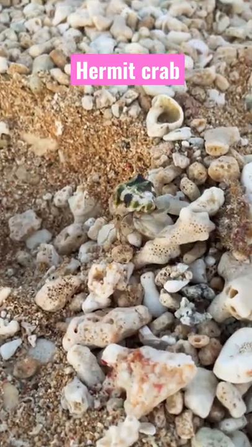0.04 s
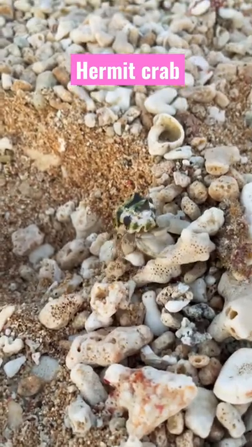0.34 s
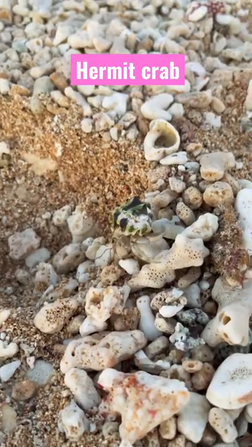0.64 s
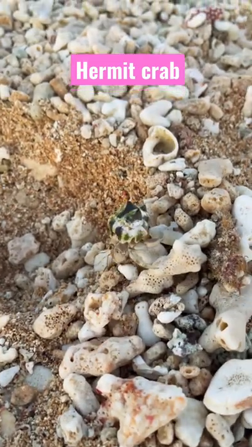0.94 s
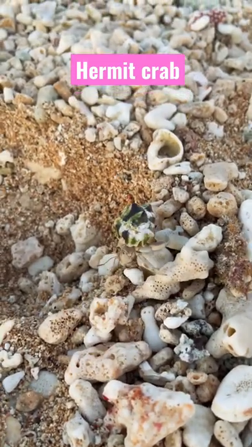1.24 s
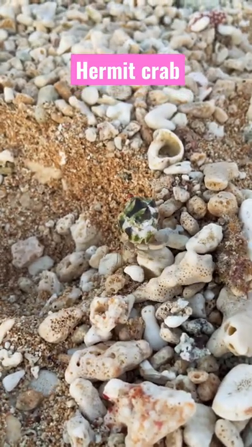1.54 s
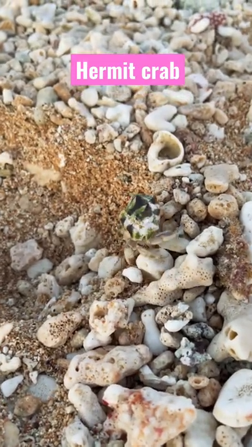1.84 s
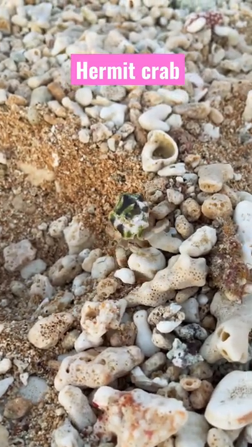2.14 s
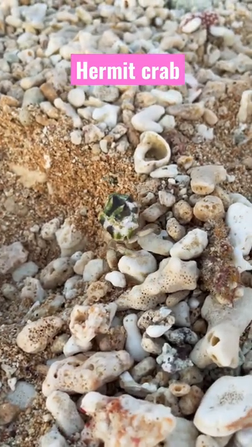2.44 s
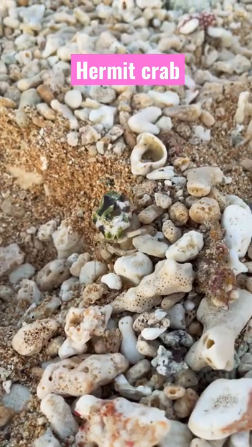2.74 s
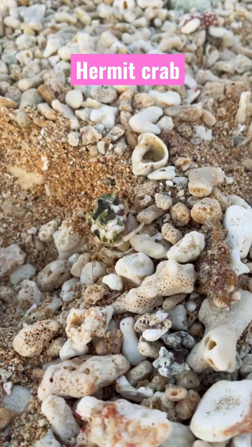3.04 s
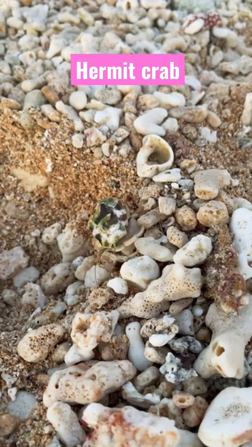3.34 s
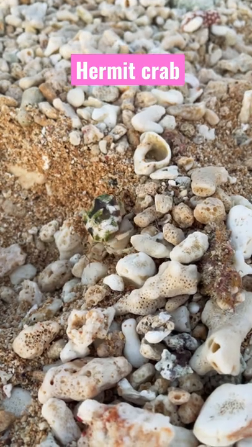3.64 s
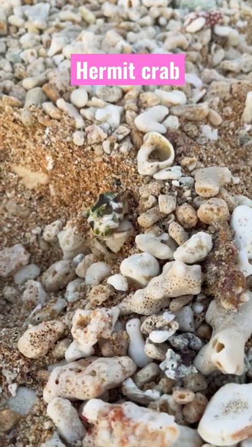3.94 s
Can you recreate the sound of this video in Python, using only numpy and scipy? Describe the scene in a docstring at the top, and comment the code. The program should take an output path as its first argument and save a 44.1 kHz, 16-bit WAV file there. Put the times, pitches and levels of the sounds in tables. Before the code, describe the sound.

Wind rumbles and buffets the microphone on a pebble beach, with distant surf behind.

```python
"""A breeze on a pebble beach, heard from a camera held low over the stones.
From the start, surf and wind roar far off and a thin hiss lies under everything, while turbulent air
rumbles and puffs on the camera body and flutters over the two microphone ports in opposite phase.
From 0.5 s one gust rises and its eddies thump the body; its bass at the ports peaks at 1 s.
After 2.6 s the gust eases, leaving the lighter wind, the distant roar and the hiss."""
import sys
import numpy as np
from scipy import signal
from scipy.fft import rfft, irfft, next_fast_len
from scipy.io import wavfile
from scipy.ndimage import uniform_filter1d, map_coordinates

SR = 44100
rng = np.random.default_rng(int(sys.argv[2]) if len(sys.argv) > 2 else 0)


def waveform_to_disk(signal):
    """Save audio, clipped to [-1, 1], as 16-bit WAV at the path in sys.argv[1]."""
    frames = np.transpose(np.atleast_2d(signal))
    scaled = np.clip(frames, -1, 1) * 32767
    samples = np.round(scaled).astype(np.int16)
    wavfile.write(sys.argv[1], SR, samples)


N = 176400
TIME = np.arange(N) / SR
HALVES = np.array([[.5], [-.5]])  # shares of a left-right difference


def amp(db):
    """Amplitude ratio of a level in decibels."""
    return 10 ** (np.asarray(db) / 20)


def unit(x):
    """Normalisation to rms 1."""
    return x / np.sqrt(np.mean(x ** 2) + 1e-20)


def along(points, hz):
    """Interpolation of (f/Hz, value) points on a logarithmic frequency axis."""
    f, values = np.transpose(points)
    return np.interp(np.log(hz + 1), np.log(f + 1), values)


def curves(rows):
    """Linear interpolation in time of each column after t/s."""
    times, *columns = np.transpose(rows)
    return [np.interp(TIME, times, column) for column in columns]


def filtered(x, response):
    """Linear filtering: the spectrum of x times a frequency response."""
    size = next_fast_len(N + SR // 2)
    return irfft(rfft(x, size) * response(np.fft.rfftfreq(size, 1 / SR)), size)[..., :N]


def turbulence(spectrum, rough_db, rate):
    """Amplitude-modulated noise, coloured, of rms 1; its drive varies at random, rate times a second."""
    wobble = map_coordinates(rng.standard_normal(2048), [TIME * rate], mode="wrap")
    drive = rng.standard_normal(N) * amp(rough_db * np.tanh(wobble))
    return unit(filtered(drive, lambda hz: amp(along(spectrum, hz))))


def patchy(x, depth_db):
    """Spectral modulation: soft random patches of gain in time and frequency; the result has rms 1."""
    spectra = signal.stft(x, nperseg=1024)[2]
    field = uniform_filter1d(rng.standard_normal(spectra.shape), size=5, axis=0)
    field = uniform_filter1d(field, size=7, axis=1)
    return unit(signal.istft(spectra * amp(depth_db * unit(field)), nperseg=1024)[1][:N])


def swell(centre_s, half_width_s):
    """Gaussian envelope in time."""
    return np.exp(-.5 * ((TIME - centre_s) / half_width_s) ** 2)


def bursts(rows, half_width_s, half_width_octaves):
    """Band-limited noise bursts, one a row, Gaussian in time and in log frequency."""
    out = np.zeros(N)
    for t, db, pitch in rows:
        band = lambda hz: np.exp(-.5 * (np.log2((hz + 1) / pitch) / half_width_octaves) ** 2)
        envelope = swell(t, half_width_s)
        burst = envelope * filtered(rng.standard_normal(N), band)
        out += amp(db) * burst * np.linalg.norm(envelope) / np.linalg.norm(burst)
    return out


def placed(x, left_db):
    """Stereo placement by level difference: left_db louder on the left."""
    return x * amp(left_db * HALVES)


def rumble():
    """Turbulent pressure fluctuations buffet the camera body as low-frequency noise."""
    # strength of the buffeting: t/s, level/dB
    levels = [(0, -36.5), (.24, -27), (.33, -35), (.5, -29), (.66, -24), (.76, -27), (.85, -24.5),
              (.93, -28.5), (1.0, -25), (1.12, -32.5), (1.3, -31), (1.38, -24.5), (1.46, -35), (2.0, -28.5),
              (2.3, -33), (2.6, -31), (2.7, -37), (3.1, -31), (3.45, -31.5), (3.7, -39), (4, -31.5)]
    # its spectral density: f/Hz, relative level/dB
    spectrum = [(12, -60), (22, -26), (32, -15), (45, -6), (60, 0.5), (90, -2), (130, -3.5), (200, -9.5),
                (300, -17.5), (500, -32), (1000, -41.5), (1600, -77)]
    level_db, = curves(levels)
    return amp(level_db) * turbulence(spectrum, rough_db=2.0, rate=30)


def surf_and_wind():
    """Distant roar of surf and wind, swelling with the breeze: modulated noise with a hollow wash."""
    # strength of the surf and wind: t/s, roar level/dB, wash level/dB
    levels = [(0, -31.5, -45), (.35, -36, -47.5), (.7, -35, -52), (1.15, -35, -55), (1.6, -36.5, -51),
              (2.0, -32, -47), (2.25, -38.5, -46.5), (2.55, -35, -46.5), (3.15, -32, -47.5),
              (3.6, -33.5, -45.5), (4, -33, -47.5)]
    # spectral densities of roar and wash: f/Hz, relative level/dB
    roar_spectrum = [(40, -18), (100, -4), (160, 1.5), (230, -0.5), (290, -2.5), (370, -4.5), (460, -13.5),
                     (600, -28), (1000, -74)]
    wash_spectrum = [(250, -35), (420, -1), (520, -1.5), (630, -4), (760, -11), (1000, -17), (1500, -66)]
    roar_db, wash_db = curves(levels)
    roar = amp(roar_db) * patchy(turbulence(roar_spectrum, rough_db=0.67, rate=20), depth_db=1.8)
    wash = amp(wash_db) * patchy(turbulence(wash_spectrum, rough_db=3.0, rate=18), depth_db=3.0)
    return roar + wash


def port_wind():
    """Flow noise of air crossing the ports: bass in the gust, a blowing midrange, a ragged flutter."""
    # strength of the flow noise: t/s, bass level/dB, midrange level/dB, flutter level/dB
    levels = [(0, -72, -41, -46), (.17, -69, -33.5, -48), (.35, -54, -33.5, -39), (.52, -47, -29, -44),
              (.68, -34, -32, -38), (.85, -39, -33, -41), (1.0, -29.5, -32, -38), (1.17, -40, -33, -42),
              (1.38, -36.5, -36, -40), (1.55, -41.5, -34.5, -37.5), (1.8, -43, -40, -42),
              (2.05, -38.5, -38, -38.5), (2.27, -40, -42, -40.5), (2.55, -37, -38.5, -38),
              (2.75, -58, -40.3, -41.5), (3.12, -69, -39.5, -40), (3.6, -77, -42, -44), (4, -71, -42, -45)]
    # spectral densities of the three bands: f/Hz, relative level/dB
    bass_spectrum = [(20, -28), (45, -18), (62, -7), (90, -1), (130, 4), (190, 3), (300, -7), (600, -47)]
    mid_spectrum = [(70, -36), (130, -26), (200, -2.5), (290, 2), (400, 2.5), (550, -4), (750, -14),
                    (1200, -45)]
    flutter_spectrum = [(200, -29), (450, -1.5), (600, 2.5), (780, -1), (1000, -5.5), (1300, -13),
                        (1700, -31), (3000, -70)]
    bass_db, mid_db, flutter_db = curves(levels)
    bass = amp(bass_db) * turbulence(bass_spectrum, rough_db=-0.5, rate=21)
    mid = amp(mid_db) * turbulence(mid_spectrum, rough_db=3.5, rate=31)
    flutter = amp(flutter_db) * turbulence(flutter_spectrum, rough_db=6.0, rate=67)
    return bass + mid + flutter


def hiss():
    """Partial coherence: the microphone pair hisses with the sum and difference of two noises."""
    # strength of the hiss: t/s, level/dB
    levels = [(0, -43.5), (.6, -44), (2.7, -44), (3.35, -43), (4, -43.5)]
    # its spectral density: f/Hz, relative level/dB
    spectrum = [(300, -31), (900, -9), (1250, -5.2), (1550, -3.2), (1700, -1.5), (1860, -3.2), (2050, -.2),
                (2400, .2), (3000, -.9), (3600, -4), (4700, -5.2), (5400, -4.8), (6300, -4.6), (7000, -5.9),
                (8000, -6.3), (9800, -7.8), (11100, -4.6), (11700, -9.8), (12400, -19)]
    # likeness of the two sides: f/Hz, coherence
    coherence = [(1000, 1), (1750, 0.95), (2200, 0.8), (2560, 0.16), (2850, 0.55), (3100, .15),
                 (3700, 0.68), (5000, 0.96), (7500, 1), (9000, 1), (10500, 0.82), (12000, 0.56)]
    # lead of the left side: f/Hz, phase/rad
    lead = [(1600, 0), (2050, 0.1), (2350, 0.7), (2700, -1.1), (3000, -1.5), (3200, 1.5), (4000, 0.42),
            (4550, 1.2), (4950, 3.5), (5600, 7), (6400, 7), (7900, 8), (8500, 9), (9500, 9.5),
            (11000, 11.5), (11900, 13.5)]
    # excess of left over right: f/Hz, level/dB
    balance = [(1800, -1), (2450, 6), (2800, -2), (3080, -1), (3500, -1), (3900, 2.5), (4700, -0.5),
               (5300, 1.5), (6000, 0)]

    def split(hz):
        angle = np.arccos(np.clip(along(coherence, hz), 0, 1)) / 2
        return amp(along(spectrum, hz)) * [np.cos(angle), np.sin(angle)]

    def lean(hz):
        return amp(HALVES * along(balance, hz)) * np.exp(1j * HALVES * along(lead, hz))

    noises = np.array([patchy(white, depth_db=1.2) for white in rng.standard_normal((2, N))])
    shared, opposed = filtered(noises, split)
    sides = np.array([shared + opposed, shared - opposed])
    level_db, = curves(levels)
    return amp(level_db) * unit(filtered(sides, lean))


def flaps():
    """Pressure transients of eddies striking a port: sharp flaps, some throaty, some bright."""
    # flaps of air: t/s, peak level/dB, centre f/Hz
    events = [(.077, -32, 620), (.681, -37, 900), (.845, -25, 350), (1.245, -38, 900), (1.36, -26, 370),
              (1.593, -39, 1050), (1.959, -36, 900), (2.198, -39, 1000), (2.362, -37, 1000),
              (2.404, -34, 905), (2.56, -36, 950), (3.105, -35, 220), (3.137, -36, 900)]
    return bursts(events, half_width_s=0.0044, half_width_octaves=0.45)


def puffs():
    """Soft blows of wind on the camera: noise confined to a narrow band sounds hollow."""
    # puffs of wind: t/s, peak level/dB, centre f/Hz
    events = [(.135, -42.5, 550), (.24, -25, 232), (.535, -27, 160), (.565, -37, 510), (.665, -30.5, 260),
              (.718, -23, 159), (.725, -37.5, 454), (.765, -26, 145), (.855, -29.5, 306), (1.369, -28, 243),
              (1.89, -38, 507), (2.59, -30.5, 198)]
    return bursts(events, half_width_s=0.012, half_width_octaves=0.35)


def thumps():
    """Single eddies thump the camera body, each a low Gaussian wave packet of random phase."""
    # eddy impacts: t/s, peak level/dB, f/Hz
    events = [(.658, -15, 94), (.818, -19.5, 62.5), (.854, -11.5, 72), (0.991, -16, 95), (1.383, -24, 58.6),
              (2.593, -26, 100), (3.429, -24.5, 100)]
    half_width_cycles = 0.82
    out = np.zeros(N)
    for t, db, hz in events:
        carrier = np.sin(2 * np.pi * (hz * (TIME - t) + rng.random()))
        out += amp(db) * swell(t, half_width_cycles / hz) * carrier
    return out


def scene():
    """Superposition: buffeting and roar in phase on both sides, port noise in antiphase, hiss around."""
    centre = placed(rumble() + thumps(), left_db=0.4) + placed(surf_and_wind() + puffs(), left_db=2)
    antiphase = np.array([[1], [-1]])
    ports = antiphase * placed(port_wind() + flaps(), left_db=0.54)
    return centre + ports + hiss()


def record(dry):
    """Band limiting: the camera acts as an ideal low-pass filter."""
    cutoff_hz = 12500
    return filtered(dry, lambda hz: hz < cutoff_hz)


dry = scene()
out = record(dry)
waveform_to_disk(out)
```